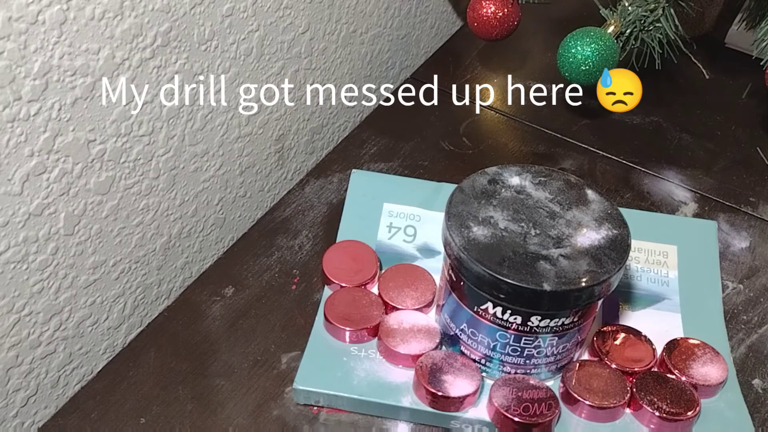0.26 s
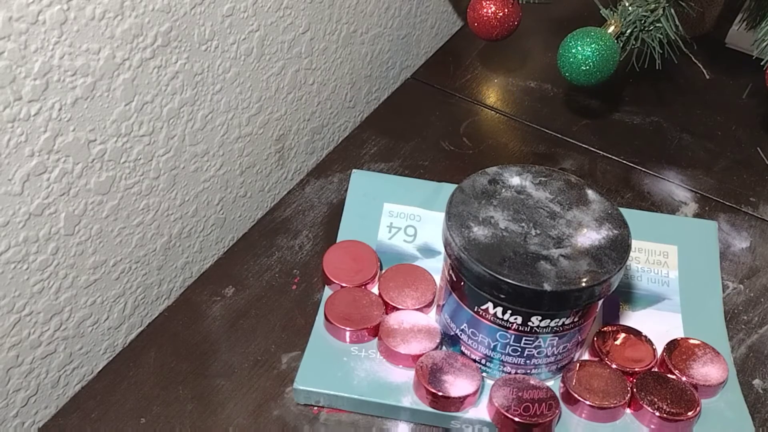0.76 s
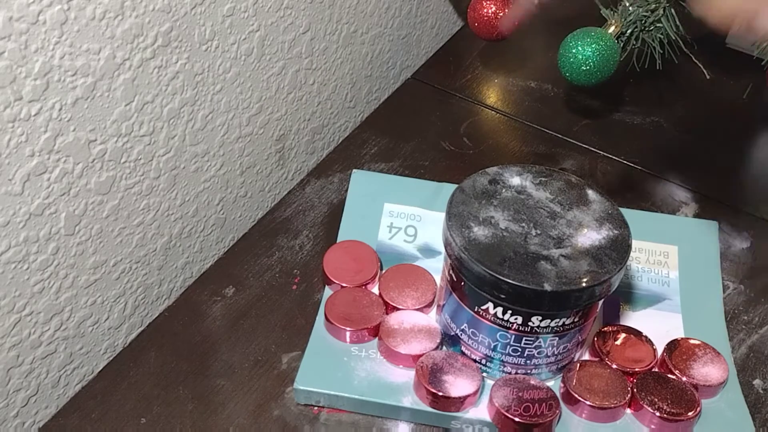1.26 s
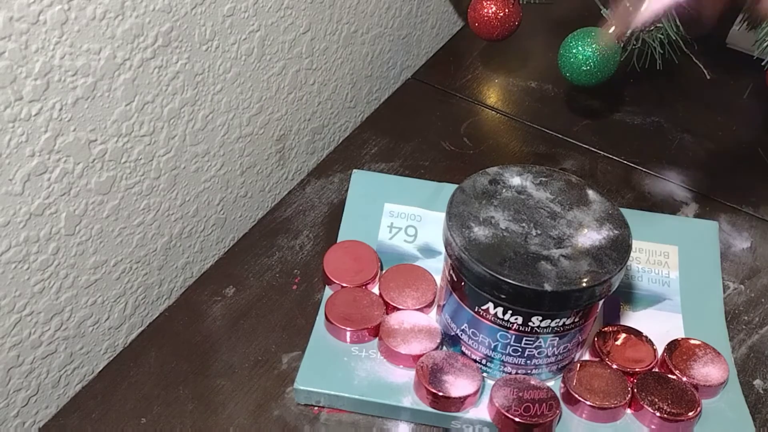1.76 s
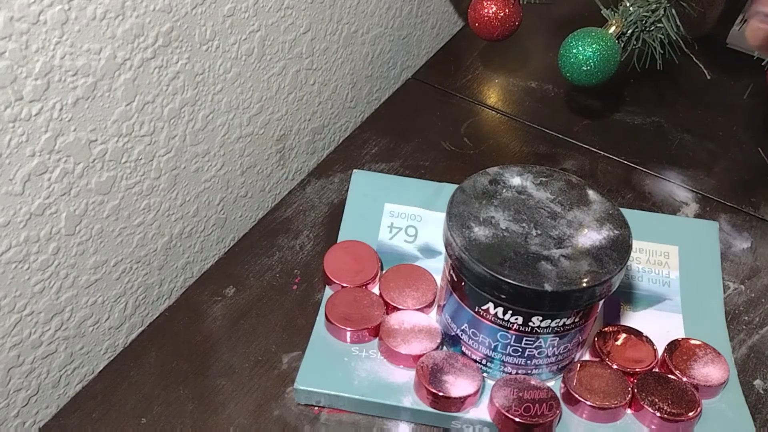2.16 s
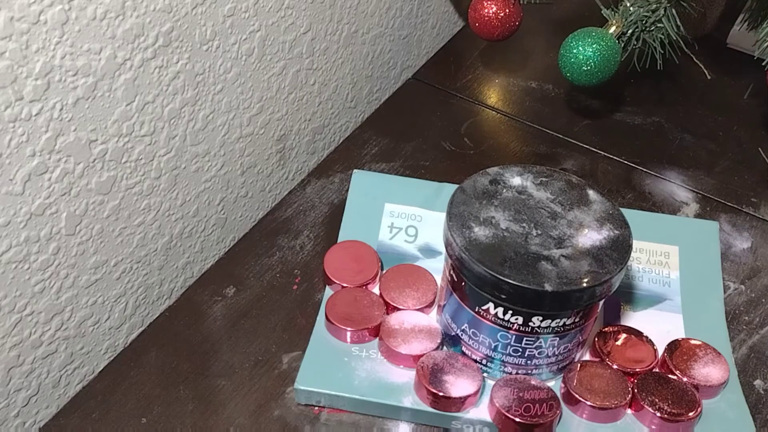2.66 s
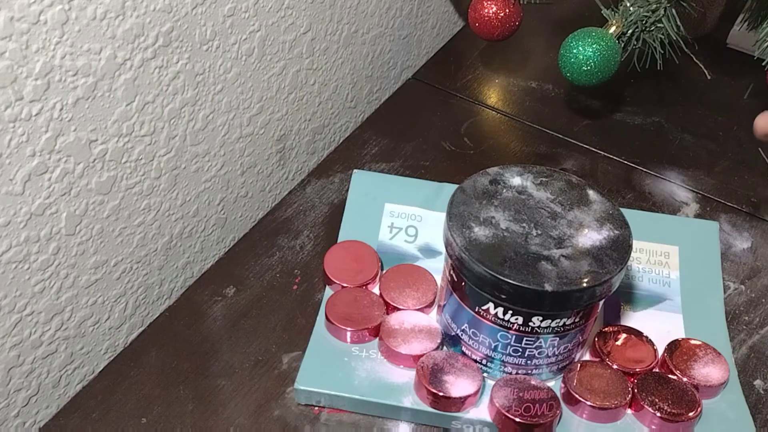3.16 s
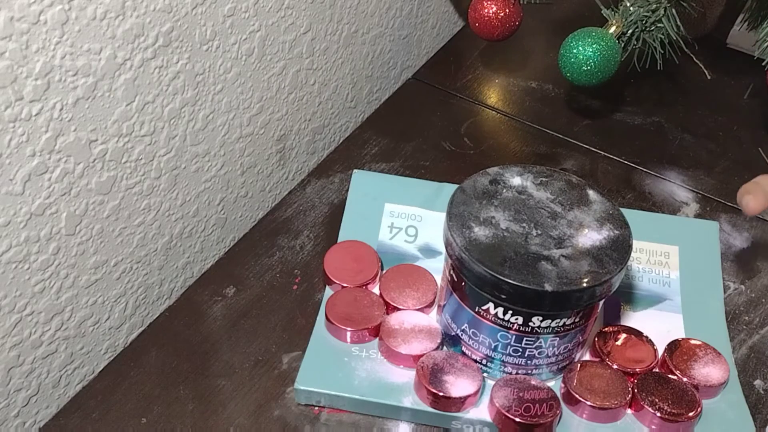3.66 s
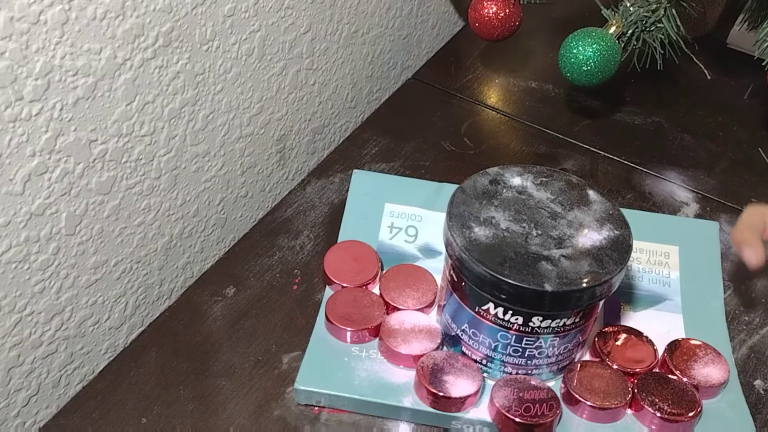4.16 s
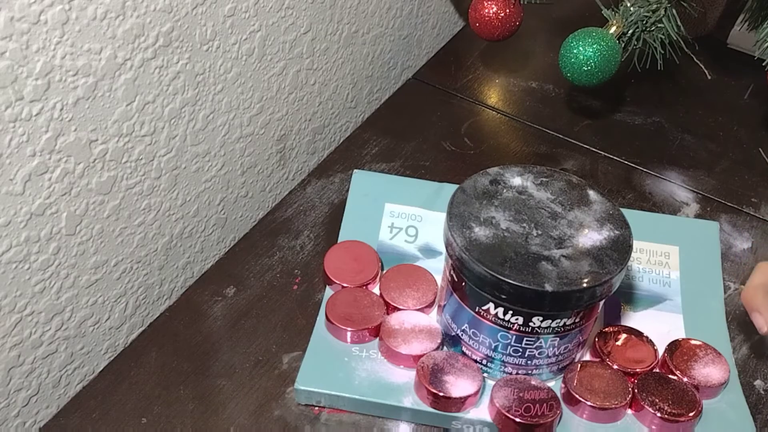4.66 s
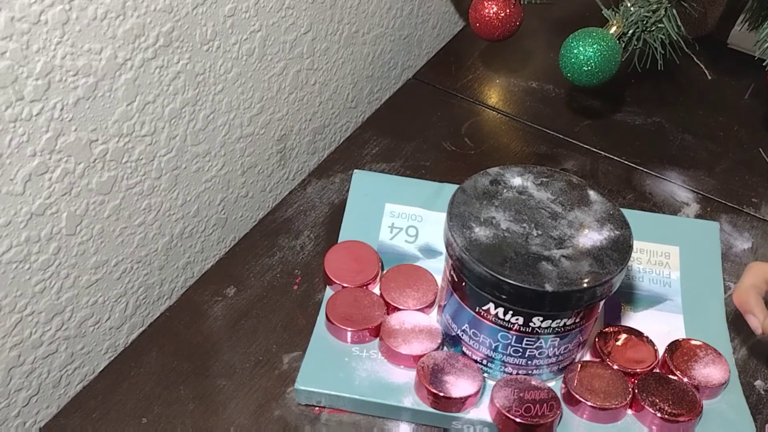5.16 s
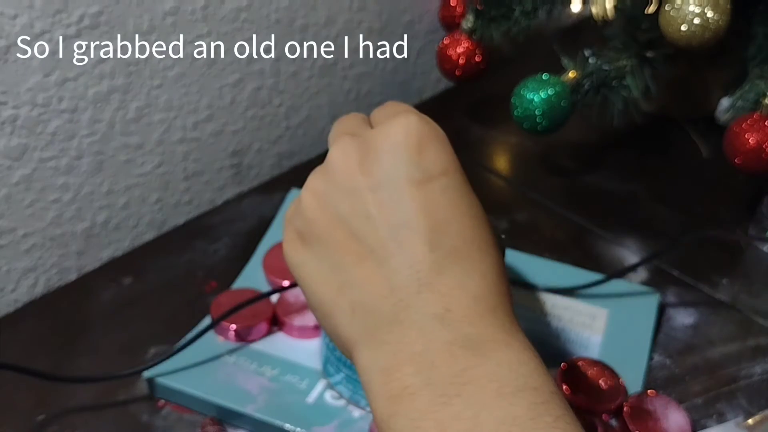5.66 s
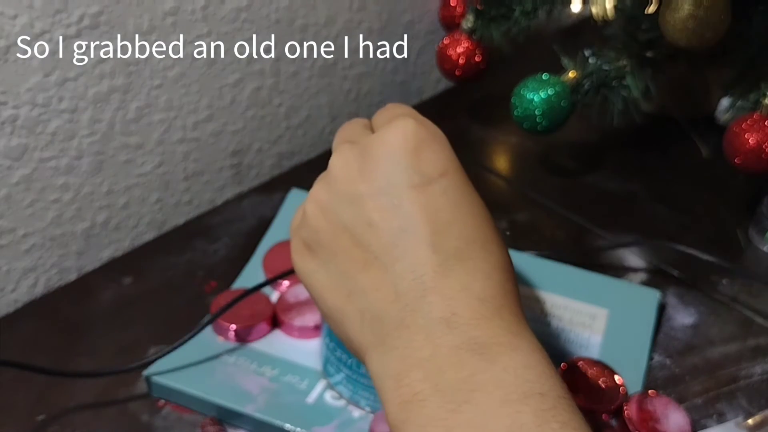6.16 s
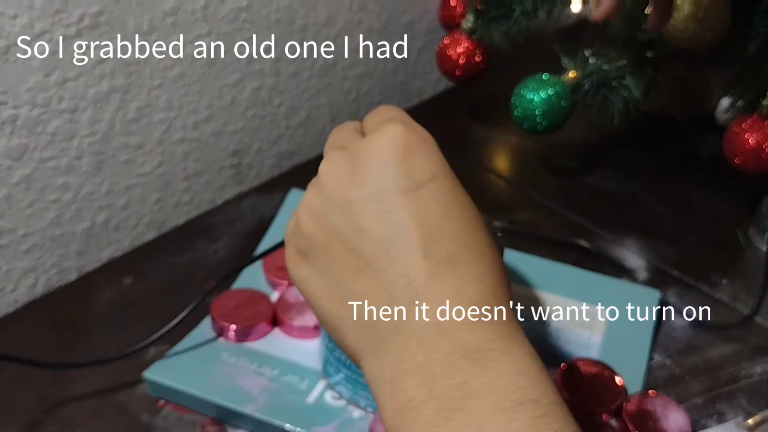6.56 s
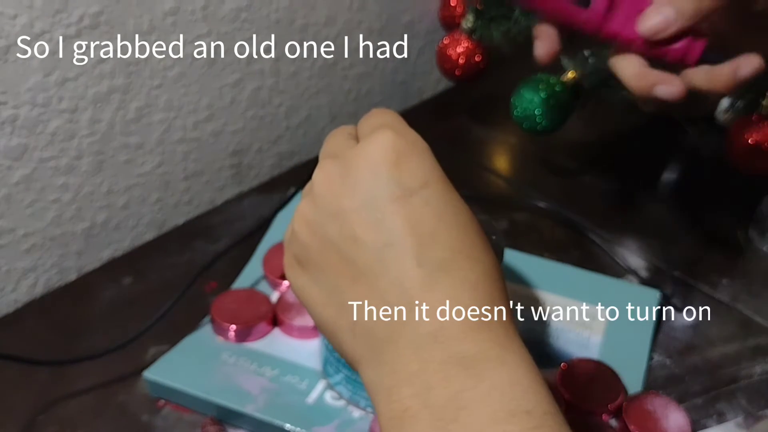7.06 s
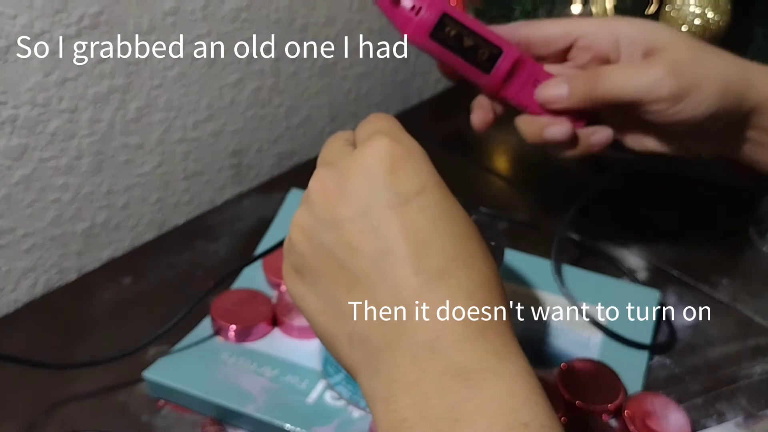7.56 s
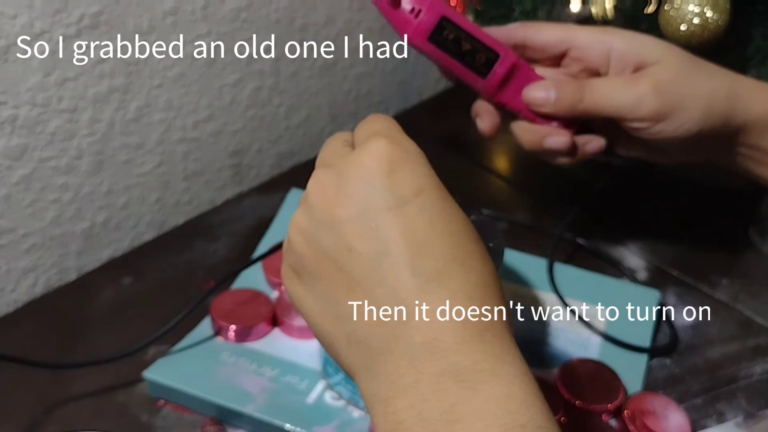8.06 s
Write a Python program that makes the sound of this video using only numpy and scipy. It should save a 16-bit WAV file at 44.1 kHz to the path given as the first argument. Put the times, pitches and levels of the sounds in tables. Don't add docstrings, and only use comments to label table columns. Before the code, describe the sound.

In a quiet room, close to the microphone, a small rotary drill squeals briefly and hisses while being knocked on a table and shaken with rattles and groans. Its fuzzy whine returns, surging and sagging as the hiss swells. A heavy low boom and rasping drag ends the motor abruptly. Then only quiet cord scrapes on hollow plastic, finger rustling and a sharp switch click remain.

```python
import sys
import numpy as np
from scipy import signal
from scipy.io import wavfile
from scipy.ndimage import uniform_filter1d

SR = 44100
rng = np.random.default_rng(int(sys.argv[2]) if len(sys.argv) > 2 else 0)


def generate_wav(signal):
    frames = np.transpose(np.atleast_2d(signal))
    scaled = np.clip(frames, -1, 1) * 32767
    pcm = np.round(scaled).astype(np.int16)
    wavfile.write(sys.argv[1], SR, pcm)


def natural_amplitude(level_db):
    exponent = np.asarray(level_db, float) / 20
    return 10 ** exponent


N = 366471
TIME = np.arange(N) / SR


def evened(x):
    return x / np.sqrt(np.mean(x ** 2) + 1e-20)


def read(points, hz):
    f, value = np.transpose(points)
    return np.interp(np.log(hz + 1), np.log(f + 1), value)


def columns(rows):
    s, *cols = np.transpose(rows)
    gate = uniform_filter1d(1. * (TIME >= s[0]) * (TIME <= s[-1]), size=300)
    return gate, [np.interp(TIME, s, c) for c in cols]


def add(mix, s, sound):
    part = mix[round(s * SR):][:len(sound)]
    part += sound[:len(part)]


def highpass(x, order, hz):
    return signal.sosfilt(signal.butter(order, hz, "high", fs=SR, output="sos"), x)


def swell(t, rise_s, peak_s):
    return t / rise_s * np.exp(1 - t / peak_s)


def resonate(x, hz, width):
    turn = np.exp(2j * np.pi * np.cumsum(hz * np.ones(len(x))) / SR)
    r = np.exp(-np.pi * width / SR)
    return 2 * (turn * signal.lfilter([1 - r], [1, -r], x / turn + 1e-18)).real


def band(x, hz, width):
    return resonate(resonate(resonate(x, hz, width), hz, width), hz, width)


def body(x, modes, widen=0.36):
    return sum((-1) ** k * natural_amplitude(db) * resonate(x, hz, widen * w) for k, (hz, w, db) in enumerate(modes))


def grit(per_s, spread_db):
    sizes = rng.standard_normal(N) * natural_amplitude(spread_db * np.minimum(rng.exponential(1, N), 4))
    return evened(sizes * (rng.random(N) < per_s / SR))


def swells(rows, gains_db, rise_s, fall_s):
    out = np.zeros(N)
    for (s, length, *_), db in zip(rows, gains_db):
        t = np.arange(0, length + 8 * fall_s, 1 / SR)
        add(out, s, natural_amplitude(db) * np.minimum(t / rise_s, 1) ** 2 * np.exp(-np.maximum(t - length, 0) / fall_s))
    return out


def steady(colour):
    return lambda hz, t: natural_amplitude(read(colour, hz))[:, None]


def coloured(gain, same, patchy_db, lag=0):
    hz, t = np.fft.rfftfreq(512, 1 / SR), np.arange(N // 128 + 5) * 128 / SR
    a, b, c, d, patches = rng.standard_normal((len(t), 257, 5)).T
    patches = evened(uniform_filter1d(uniform_filter1d(patches, size=20, axis=1), size=5, axis=0))
    like = np.clip(read(same, hz), -1, 1)[:, None]
    left = a + 1j * b
    late = np.exp(2j * np.pi * hz[:, None] * lag / SR)
    right = like * left * late + np.sqrt(1 - like ** 2) * (c + 1j * d)
    z = np.array([left, right]) * gain(hz, t) * natural_amplitude(patchy_db * patches)
    return evened(signal.istft(z, nperseg=512, noverlap=384)[1][:, :N])


# (pitch_hz, t60_s)
ROOM_DECAY = [(150, 0.3), (1000, 0.089), (4000, 0.08), (12000, 0.012)]


def placed(x, wet_db, pan_db, lag):
    taps = np.zeros((2, SR // 2))
    at = np.arange(60, SR // 2 - 20, 20) + rng.integers(0, 20, (2, (SR // 2 - 61) // 20))
    np.put_along_axis(taps, at, rng.choice([-1., 1.], at.shape), 1)
    hz, t, z = signal.stft(taps, SR, nperseg=256)
    tail = signal.istft(z * natural_amplitude(-60 * t / read(ROOM_DECAY, hz)[:, None]), SR, nperseg=256)[1]
    tail *= natural_amplitude(wet_db) / np.linalg.norm(tail[0])
    tail[[0, 1], [max(lag, 0), max(-lag, 0)]] += natural_amplitude([pan_db / 2, -pan_db / 2])
    return signal.fftconvolve(x[None], tail, axes=1)[:, :N] / np.sqrt(1 + natural_amplitude(2 * wet_db))


# (pitch_hz, level_db)
FLOOR_COLOUR = [(35, -26.5), (60, -15), (129, -8), (285, -18.5), (351, -27.5), (464, -17), (829, -20),
                (2250, -26.5), (2780, -30), (3340, -30.5), (15500, -37)]
# (pitch_hz, likeness)
FLOOR_LIKENESS = [(60, 0.58), (240, 0.84), (950, -0.022), (3770, -0.24), (15000, -0.43)]
# (pitch_hz, level_db)
MAINS_HUM = [(118.4, -73.5)]
# (pitch_hz, level_db per Hz)
RUSTLE_TONE = [(1470, -36), (2500, -8.5), (3370, 0), (5200, -4.5), (6010, -2), (8610, -7), (9440, -8),
               (15500, -6.5)]
# (start_s, length_s, level_db)
RUSTLE_MOVES = [(5.324, 2.7, -77.5), (5.326, 0.032, -74), (5.394, 0.11, -74.5), (5.628, .02, -91),
                (5.683, 0.074, -78), (5.813, 0.17, -82), (6.154, 0.027, -73), (6.29, 0.22, -77.5),
                (6.634, 0.047, -74), (6.71, 0.045, -67.5), (6.838, 0.18, -73.5), (7.137, .01, -63),
                (7.185, 0.06, -69.5), (7.29, 0.041, -72.5), (7.396, 0.099, -74.5), (7.516, 0.031, -74),
                (7.6, 0.083, -79)]


def background():
    floor = highpass(coloured(steady(FLOOR_COLOUR), FLOOR_LIKENESS, patchy_db=2.5), 3, 55)
    hum = sum(natural_amplitude(db + 2.5) * np.sin(2 * np.pi * hz * TIME) for hz, db in MAINS_HUM)
    moves = swells(RUSTLE_MOVES, [row[-1] for row in RUSTLE_MOVES], rise_s=0.013, fall_s=0.019)
    rustle = moves * coloured(steady(RUSTLE_TONE), [(1000, .3), (15000, .2)], patchy_db=1)
    return natural_amplitude(-70.5) * floor + hum + rustle * natural_amplitude([[-1.2], [1.2]])


# (start_s, peak_db, pitch_hz, t60_s, left_right_db)
SWITCH_CLICKS = [(5.355, -52, 1980, 0.022, -22), (5.357, -45, 1250, 0.028, -2),
                 (5.704, -58.5, 1460, 0.064, 12), (6.997, -75, 5000, .04, -8),
                 (7.003, -68, 6140, 0.064, -1), (7.008, -58, 3780, 0.052, -16),
                 (7.01, -59.5, 12500, 0.034, -15), (7.144, -64.5, 3540, 0.034, -4),
                 (7.145, -61.5, 11900, 0.0092, 20.5), (7.381, -74, 4500, .024, -11),
                 (7.874, -66, 8800, .05, -16.5), (7.8795, -40, 11000, 0.012, -20),
                 (7.880, -36, 7900, 0.063, -11), (7.882, -52, 7200, 0.18, -8.5)]


def clicks():
    out, t = np.zeros(N), np.arange(4000) / SR
    for (s, db, hz, t60, _), noise in zip(SWITCH_CLICKS, rng.standard_normal((len(SWITCH_CLICKS), 4000))):
        snap = (t == 0) * 1.2 + noise * np.minimum(t / 0.0008, 1)
        click = highpass(band(snap * natural_amplitude(-60 * t / t60), hz, 290 + 0.68 * hz), 2, 0.25 * hz)
        add(out, s, natural_amplitude(db + 9.5) * click / abs(click).max())
    pan_db = np.interp(TIME, [row[0] for row in SWITCH_CLICKS], [row[-1] for row in SWITCH_CLICKS])
    return placed(out, wet_db=-8, pan_db=0, lag=8) * natural_amplitude([pan_db / 2, -pan_db / 2])


# (start_s,
# peak_db, pitch_hz)
CORD_SLIPS = [(0.2374, -34.5, 1900), (0.5644, -46, 1920), (5.429, -52, 1150), (5.4586, -60, 1150),
              (5.6496, -61, 1220), (5.661, -56, 1120), (5.7172, -46, 1190), (5.7266, -41.5, 1490),
              (5.7389, -46, 1170), (5.7616, -44, 1140), (5.7872, -43, 1160), (5.793, -49, 1185),
              (5.8543, -48, 1130), (5.8844, -51.5, 1166), (5.9244, -52, 2020), (5.9539, -57, 2080),
              (6.137, -62, 2110), (6.1876, -53, 1166), (6.2422, -58, 1160), (6.2647, -50, 1540),
              (6.279, -49, 1550), (6.3161, -50, 1140), (6.3346, -49, 1150), (6.3647, -56, 1120),
              (6.384, -56, 1190), (6.556, -49, 3530), (6.6513, -61, 2080), (6.7324, -53, 3460),
              (6.7805, -61, 1770), (6.8502, -49.5, 3060), (6.946, -52, 3820), (6.983, -48, 2900),
              (7.2175, -68, 3380), (7.3223, -65, 1110), (7.4949, -63, 2060), (7.549, -58.5, 1310),
              (7.6101, -53, 2320)]


def slips():
    out, t = np.zeros(N), np.arange(2000) / SR
    for (s, db, hz), noise in zip(CORD_SLIPS, rng.standard_normal((len(CORD_SLIPS), 2000))):
        u = t * hz / 4.0
        push = noise * u * np.exp(1 - u)
        ring = resonate(push, hz, .045 * hz) + 0.032 * band(push, 2050, 3000)
        add(out, s - .002, natural_amplitude(db - 2.5) * ring / abs(ring).max())
    return out


# (pitch_hz, width_hz, level_db)
SHELL_MODES = [(1165, 70, 0), (1540, 80, -2), (2090, 140, -13)]
# (start_s, length_s, level_db, bright_share_db, dull_share_db)
CORD_STROKES = [(5.343, 0.091, -60.5, -12, -12), (5.423, 0.1, -65, -7, -9), (5.515, 0.62, -77.5, -2.5, -1),
                (5.624, 0.048, -69.5, -27, -15), (5.682, 0.045, -59, 0, -46), (5.754, 0.026, -54, -25, -50),
                (5.826, 0.026, -56, -18, -35), (5.874, 0.029, -67, -2, -19), (5.927, 0.095, -83, 6, -11),
                (6.118, 0.089, -71.5, 0.5, -20), (6.22, 0.071, -67.5, -9, -21),
                (6.281, 0.04, -58, -27, -40), (6.336, 0.046, -55.5, -20, -27), (6.387, 0.41, -77.5, 3, -6),
                (6.761, 0.19, -76.5, 0.5, -8), (6.97, 0.059, -80.5, 1, -25), (7.116, 0.023, -72, 2, -20),
                (7.2, 0.13, -93, -1, -12), (7.48, 0.096, -73, 0, -5), (7.582, .1, -73.5, 0.5, -20)]


def cord():
    _, _, db, bright_db, dull_db = np.transpose(CORD_STROKES)
    rub = grit(2200, 2.0)
    mid = evened(band(body(rub, SHELL_MODES, widen=1.5) + .15 * rub, 1800, 3200))
    bright = evened(band(rub, 2620, 2300))
    dull = evened(resonate(resonate(rub, 550, 1000), 490, 1000))
    layers = (mid, db), (bright, db + bright_db), (dull, db + dull_db)
    return sum(x * swells(CORD_STROKES, level_db, rise_s=0.032, fall_s=0.017) for x, level_db in layers)


# (start_s, peak_db)
LOAD_CATCHES = [
    (4.36, -66),
    (4.385, -64),
    (4.793, -57),
    (4.818, -57),
    (4.849, -48),
    (4.875, -51),
    (5.26, -69),
]


def catches():
    out, t = np.zeros(N), np.arange(1500) / SR
    for (s, db), noise in zip(LOAD_CATCHES, rng.standard_normal((len(LOAD_CATCHES), 1500))):
        add(out, s, natural_amplitude(db) * evened(band(noise, 540, 1400)) * swell(t, 0.0035, 0.0041))
    return out


# (pitch_hz, likeness)
HISS_LIKENESS = [(1000, 0.87), (2500, 0.25), (5000, 0.12), (14000, 0.26)]
# (pitch_hz, width_hz, level_db)
BOOM_MODES = [(130, 28, -5), (151.6, 17.3, 3), (217.3, 5.4, -8.5), (93, 13, -23), (60, 26, -23)]
# (pitch_hz, width_hz, level_db)
RASP_MODES = [(239, 29, 4), (353, 47, 2), (486, 43, 0), (681, 39, 0.5), (800, 40, -13), (1090, 33, -15),
              (1220, 32, -18), (1577, 48, 1)]
# (pitch_hz, level_db per Hz)
FIZZ_COLOUR = [(1150, -32), (1820, -20), (2150, -5), (3110, 5), (3660, -22), (3940, -3), (6020, -3),
               (7480, -7.5), (8820, -15.5), (10800, -11), (11900, -24), (12400, -34), (12900, -18),
               (15500, -17.5)]
# (start_s, weight_db, speed_db)
DRAG_MOVES = [
    (4.77, -36, -36),
    (4.82, -13.5, -26),
    (4.905, 2, -0.5),
    (4.96, -1.5, -4.5),
    (5.03, -1, 1),
    (5.12, 1.5, -1),
    (5.168, -5.5, -16),
    (5.2, -20, -2.5),
    (5.24, -19, -33),
]


def drag():
    gate, (weight_db, speed_db) = columns(DRAG_MOVES)
    stick_slip = grit(2500, 1.85)
    rasp = evened(body(stick_slip, RASP_MODES, widen=1.2) + 0.22 * band(stick_slip, 800, 1900))
    rasp = signal.sosfilt(signal.butter(12, 1760, fs=SR, output="sos"), rasp)
    rasp *= gate * natural_amplitude(-46.5 + 0.21 * weight_db + 0.71 * speed_db)
    fizz_gain = gate * np.clip((TIME - 4.86) / 0.021, 0, 1) * natural_amplitude(-48 + 0.14 * weight_db + 1.27 * speed_db)
    fizz = fizz_gain * coloured(steady(FIZZ_COLOUR), HISS_LIKENESS, patchy_db=-1.0)
    boom = evened(band(body(stick_slip, BOOM_MODES), 133, 260))
    boom /= np.sqrt(uniform_filter1d(boom ** 2, size=900) + .15)
    dying_db = 239 * np.maximum(TIME - DRAG_MOVES[-1][0], 0)
    boom *= (TIME > DRAG_MOVES[0][0]) * natural_amplitude(-36 + weight_db - dying_db)
    return boom, rasp, fizz


# (pitch_hz, width_hz, level_db)
TABLE_MODES = [(484, 140, -6.5), (795, 143, 2), (1150, 130, -1.5), (1544, 180, 3), (2020, 200, -6),
               (2640, 260, -0.5), (3400, 1100, -8), (4350, 920, -2), (6260, 1300, -14.5)]
# (start_s, peak_db, thud_db, crack_db)
TABLE_TAPS = [
    (0.157, -27, -33.5, 11),
    (0.311, -30.5, -35, 10),
    (0.448, -37.5, -34, -11),
    (0.612, -31.5, -32.5, -3),
    (0.748, -36, -33, -23),
    (0.861, -45.5, -31, 5),
    (0.993, -54, -24, -6),
    (1.594, -49, -29, 5),
]


def taps():
    out, t = np.zeros(N), np.arange(6000) / SR
    noises = rng.standard_normal((len(TABLE_TAPS), 2, 6000))
    for (s, db, thud_db, crack_db), noise in zip(TABLE_TAPS, noises):
        contact = .6 * np.exp(-((t - .003) / .00006) ** 2)
        contact += 0.3 * noise[0] * (t / 0.004) ** 2 * np.exp(2 - t / 0.002)
        ring = band(body(contact, TABLE_MODES, widen=0.68) + 0.15 * contact, 3200, 6500)
        ring = highpass(ring, 2, 260)
        thud = 1.74 * np.sin(2 * np.pi * 142 * t) * swell(t, 0.03, 0.015)
        thud += 0.8 * np.sin(2 * np.pi * 212 * t) * swell(t, 0.014, 0.009)
        crack = resonate(noise[1], 8900, 3400) * swell(t, 0.0056, 0.0037)
        knock = ring / abs(ring).max() + natural_amplitude(thud_db) * thud + 0.14 * natural_amplitude(crack_db) * crack
        add(out, s - .003, natural_amplitude(db + 10.0) * knock)
    return out


# (start_s, rattle_db, rattle_decay_s, groan_db, lowest_pitch_hz)
WRIST_SHAKES = [
    (0, -38.5, 0.037, -78, 584),
    (0.991, -60, 0.12, -70.5, 484),
    (1.125, -56.5, 0.28, -70.5, 460),
    (1.309, -49, 0.042, -69, 590),
    (1.445, -50, 0.05, -68.5, 514),
    (1.595, -50, 0.05, -74.5, 526),
    (1.735, -46, 0.032, -72, 533),
    (1.866, -49, 0.026, -67.5, 554),
    (2.03, -64, 0.01, -70.5, 500),
]


def shakes():
    out, t = np.zeros(N), np.arange(9000) / SR
    noises = rng.standard_normal((len(WRIST_SHAKES), 2, 9000))
    for (s, db, decay, groan_db, low_hz), noise in zip(WRIST_SHAKES, noises):
        rattle = evened(np.diff(band(noise[0], 2760, 6600), prepend=0))
        rattle *= (1 - np.exp(-t / 0.00061)) * np.exp(-t / decay)
        pitch_hz = 900 - (900 - low_hz) * np.exp(-(t / 0.05) ** 1.5)
        flutter = abs(1 + evened(band(noise[0], 0, 60)))
        groan = evened(band(noise[1], pitch_hz, 220)) * swell(t, 0.04, 0.04) * flutter
        add(out, s, natural_amplitude(db) * rattle + natural_amplitude(groan_db) * groan)
    return out


# (start_s, pitch_hz, level_db)
MOTOR_SPIN = [
    (0, 800, -65),
    (.2, 780, -72),
    (1.1, 796, -75.5),
    (1.82, 860, -73.5),
    (2.05, 873, -66),
    (2.4, 912, -64),
    (3.3, 924, -66.5),
    (4.2, 901, -65),
    (4.65, 843, -62.5),
    (4.78, 850, -65),
]
# (centre_s, change_db, half_length_s)
WHINE_SURGES = [(2.188, -8, 0.039), (2.47, 1.5, .03), (3.126, 0.5, .02), (3.235, 9.5, 0.023),
                (3.322, -1.5, .03), (3.594, 9, 0.016), (3.644, -1, .02), (3.726, 6, 0.019),
                (3.902, 7.5, .02), (3.928, -13, 0.016), (3.983, 9.5, 0.013), (4.027, -13.5, .03),
                (4.108, 2.5, .03), (4.19, -11, 0.035), (4.307, 8.5, 0.023), (4.35, -11, 0.016),
                (4.387, 9, .015), (4.48, 2.5, .03), (4.73, 3.5, 0.024)]
# (start_s, length_s, level_db, first_pitch_hz)
MOTOR_SQUEALS = [
    (0, 0.11, -36.5, 793),
    (0.256, 0.038, -54, 800),
    (0.467, 0.071, -52.5, 827),
]


def motor_whine():
    gate, (hz, db) = columns(MOTOR_SPIN)
    air = rng.standard_normal(N)
    surge_db = sum(change_db * np.exp(-((TIME - s) / half) ** 2) for s, change_db, half in WHINE_SURGES)
    whine = natural_amplitude(surge_db) * evened(band(air, hz - 4.7 * surge_db, 110))
    partner = natural_amplitude(-1) * evened(band(air, hz * 1.15, 160))
    out = gate * natural_amplitude(db) * (whine + partner)
    out *= natural_amplitude(1.2 * evened(band(rng.standard_normal(N), 0, 40)))
    for s, length, level_db, first_hz in MOTOR_SQUEALS:
        u = np.arange(0, length, 1 / SR) / length
        phase = 2 * np.pi * np.cumsum(first_hz + 110 * u ** 2) / SR
        add(out, s, natural_amplitude(level_db - 12 * u ** 1.5) * np.sqrt(1 - u) * np.sin(phase))
    return out


# (start_s, level_db, hold: 0 to 5 blends the colours, up to 6
HAND_CARRY = [(0, -40.5, .01), (.2, -41.5, 0.64), (.45, -46.5, 0.19), (.95, -48, 0.55), (1.35, -52, 1.36),
              (1.8, -49.5, 1.12), (2.09, -50, 0.75), (2.19, -54.5, 1.56), (2.53, -54.5, 1.8),
              (2.9, -50, 2.5), (3.25, -46.5, 2.86), (3.7, -44, 3.4), (4.0, -44, 4.2), (4.28, -43.5, 3.85),
              (4.45, -39.5, 4.76), (4.74, -39.5, 5.98), (4.89, -43.5, 4.65), (4.96, -78, 7.3)]
# (pitch_hz, level_db per Hz)
HOUSING_HOLDS = [
    [(760, -49), (1300, -14.5), (1910, -5.5), (2500, -5), (3450, -7.5), (4330, -11), (7740, -1),
     (10500, -12), (14700, -20.5), (15500, -15)],
    [(760, -28.5), (1300, -17), (1620, -12.5), (2000, -21), (3630, -5), (5730, -8), (8410, -1.5),
     (11100, -10), (13300, -8), (15500, -14.5)],
    [(760, -36), (1300, -24.5), (1810, -11), (2470, -16.5), (3380, -8), (6980, -4.5), (7820, -4.5),
     (11500, -16.5), (14600, -20), (15500, -13)],
    [(760, -49), (1300, -23.5), (2770, -20), (3240, -14.5), (4200, -10.5), (7900, -6.5), (8580, 1),
     (10600, -7), (12100, -19.5), (13500, -16), (15500, -18)],
    [(760, -49), (1300, -26.5), (2000, -21.5), (2700, -25), (3240, -12), (4200, -10), (6500, -3.5),
     (8400, -4.5), (10600, -2.5), (12100, -17), (13500, -5.5), (15500, -10.5)],
    [(760, -39), (1300, -26.5), (2150, -26.5), (2700, -28), (3070, -16.5), (3660, -17), (4510, -8.5),
     (6290, -2), (7820, -8), (10700, -13), (12350, -21), (13400, -20), (15500, -13.5)],
]
# (start_s, end_s, pitch_hz, width_hz, level_db)
HISS_RIDGES = [(-1.5, 0.48, 4400, 120, -10), (1.5, 1.3, 1700, 150, -6.5), (2.5, 3.0, 1980, 99, -11),
               (3.0, 4.1, 2500, 91, -13), (3, 4.0, 3280, 140, -11), (4.5, 4.4, 2720, 154, -9.5),
               (3.5, 5.3, 3620, 130, -10.5), (0.5, 3.1, 6540, 150, -7.5), (1.5, 2.9, 4800, 120, -7.5),
               (1.5, 5.4, 5500, 130, -9), (4.5, 4.96, 12350, 300, -7.5), (3.5, 4.3, 8400, 120, 4.5),
               (3.5, 4.4, 3050, 73, 3.5), (4.5, 5.1, 5900, 120, 4.5), (4, 4.9, 6190, 150, 2.5),
               (4.3, 4.1, 3600, 90, 6.5), (3.5, 6.1, 10400, 280, 3)]


def held(hz, t):
    colours = np.array([natural_amplitude(read(c, hz)) for c in HOUSING_HOLDS])
    colours = np.log(colours / np.linalg.norm(colours, axis=1, keepdims=True))
    hold = np.interp(t, *np.transpose(HAND_CARRY)[::2])
    share = np.maximum(1 - abs(hold - np.arange(len(HOUSING_HOLDS))[:, None]), 0)
    combs = rng.standard_normal((30, len(hz)))
    ripple = np.array([np.interp(t / .45, np.arange(len(combs)), c) for c in combs.T])
    resting_db = 0
    for start, end, f, width, db in HISS_RIDGES:
        resting = np.clip(np.minimum(t - start, end - t) / .05 + 1, 0, 1)
        resting_db = resting_db + db * np.outer(np.exp(-((hz - f) / width) ** 2), resting)
    blend = np.exp(colours.T @ (share / (share.sum(0) + 1e-9)))
    blend = blend * natural_amplitude(3.4 * np.minimum(ripple, 1.0) + resting_db)
    return blend / np.linalg.norm(blend, axis=0)


def bearing_hiss():
    gate, (db, _) = columns(HAND_CARRY)
    lumps = evened(uniform_filter1d(grit(2500, 2.8) ** 2, size=60))
    noise = coloured(held, HISS_LIKENESS, patchy_db=2.5, lag=9.8)
    return gate * natural_amplitude(db + 2.0) * (0.87 + 0.11 * lumps) * noise * natural_amplitude([[.3], [-.3]])


def scene():
    boom, rasp, fizz = drag()
    mix = background() + clicks()
    mix += placed(cord() + slips(), wet_db=-4.5, pan_db=-5.5, lag=6)
    mix += placed(boom, wet_db=-22.5, pan_db=-1.0, lag=2) + fizz
    mix += placed(rasp + catches(), wet_db=-8, pan_db=.3, lag=2)
    mix += placed(taps(), wet_db=-8, pan_db=2.5, lag=-15)
    mix += placed(motor_whine() + shakes(), wet_db=-6, pan_db=-2, lag=7)
    return mix + bearing_hiss()


def low_pass(x):
    return signal.sosfilt(signal.butter(12, 16850, fs=SR, output="sos"), x)


def record(dry):
    lowpass = signal.firwin(511, 15650, window=("kaiser", 9), fs=SR)
    limited = signal.oaconvolve(dry, lowpass[None], "same")
    return low_pass(limited)


dry = scene()
out = record(dry)
generate_wav(out)
```